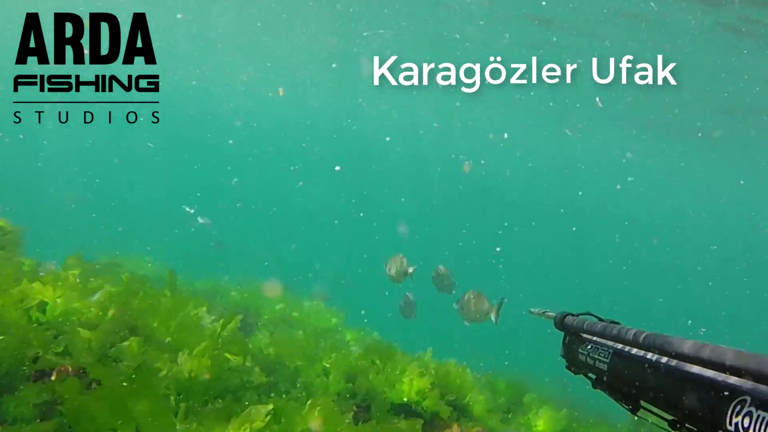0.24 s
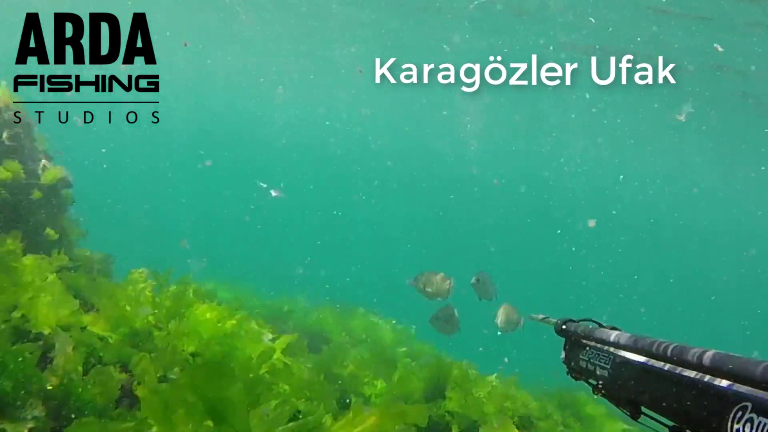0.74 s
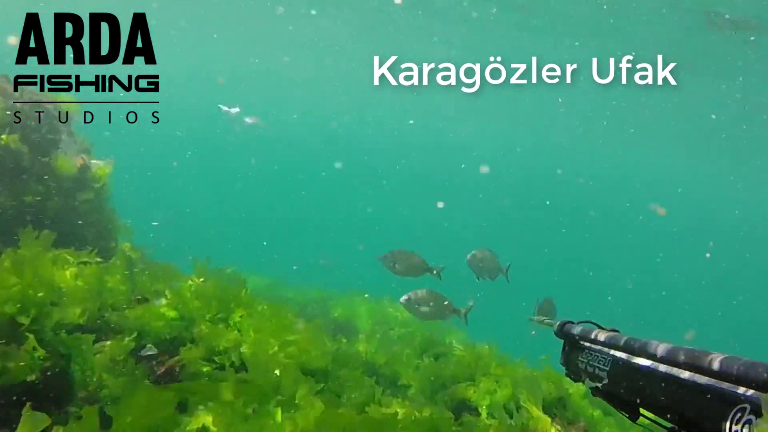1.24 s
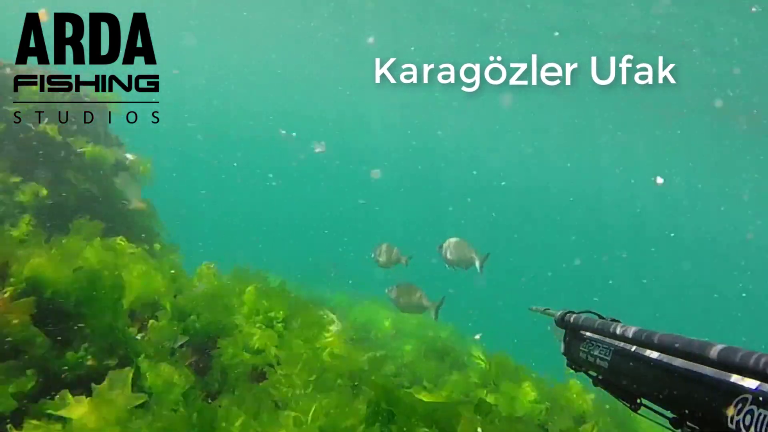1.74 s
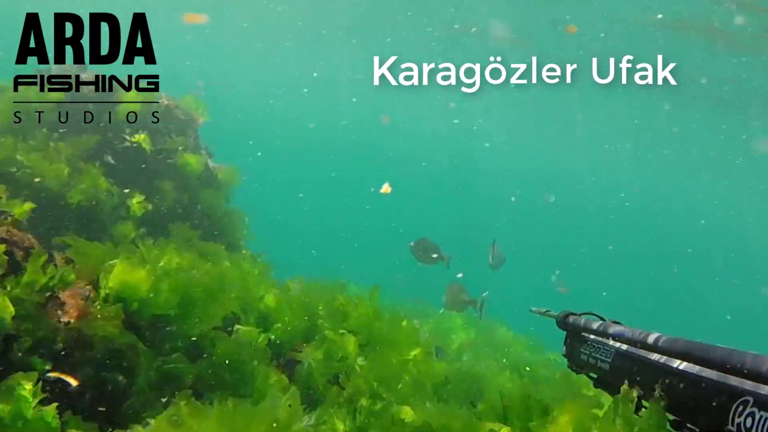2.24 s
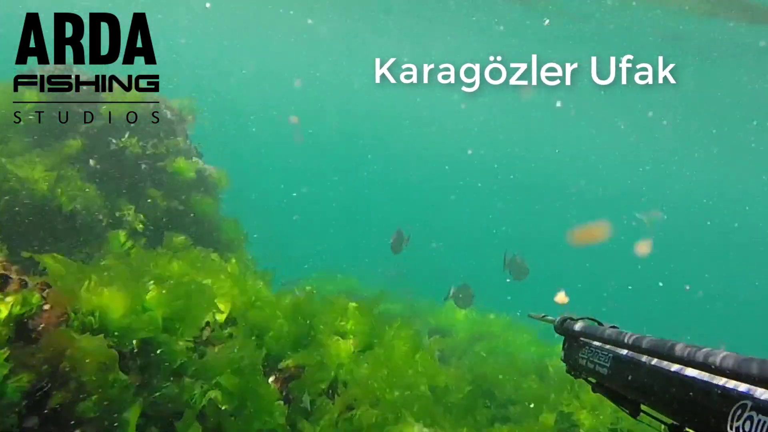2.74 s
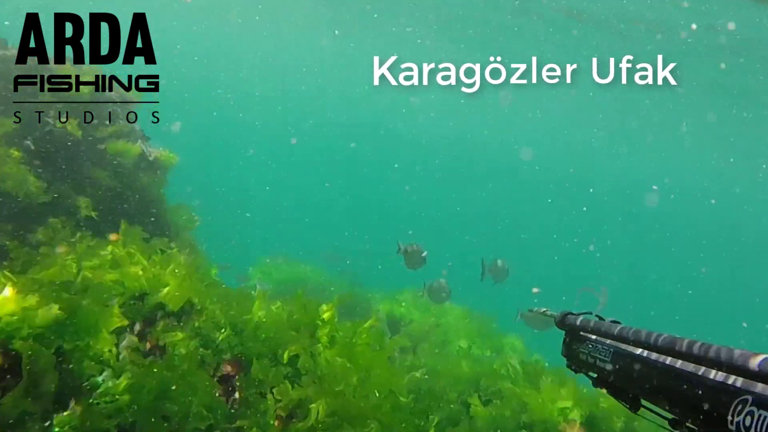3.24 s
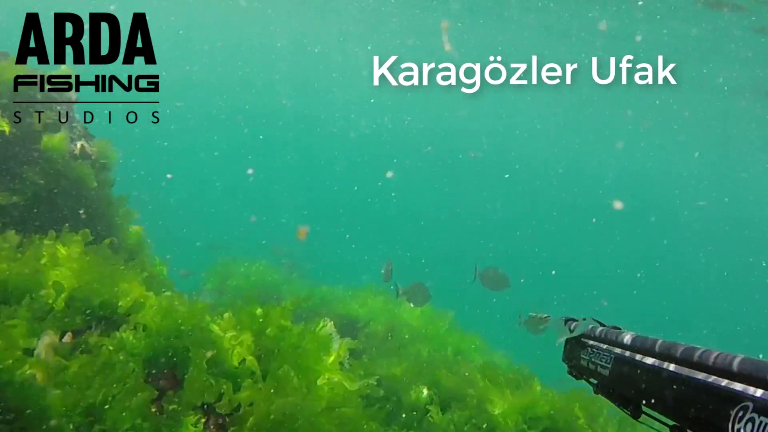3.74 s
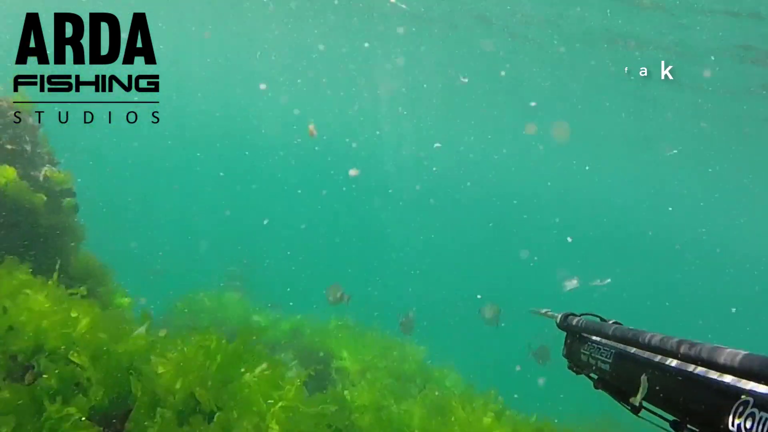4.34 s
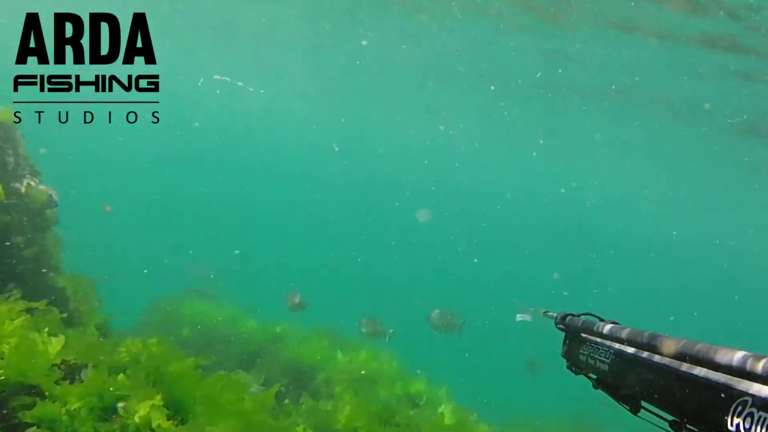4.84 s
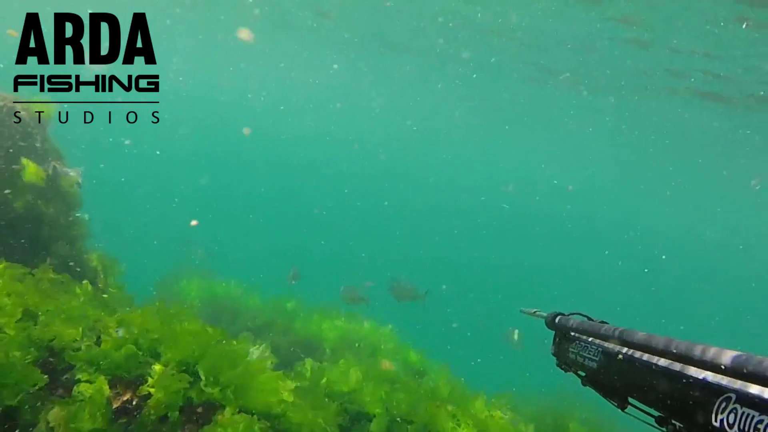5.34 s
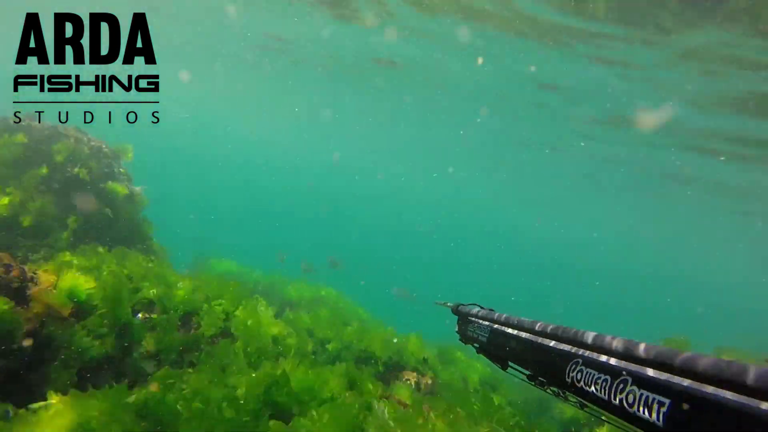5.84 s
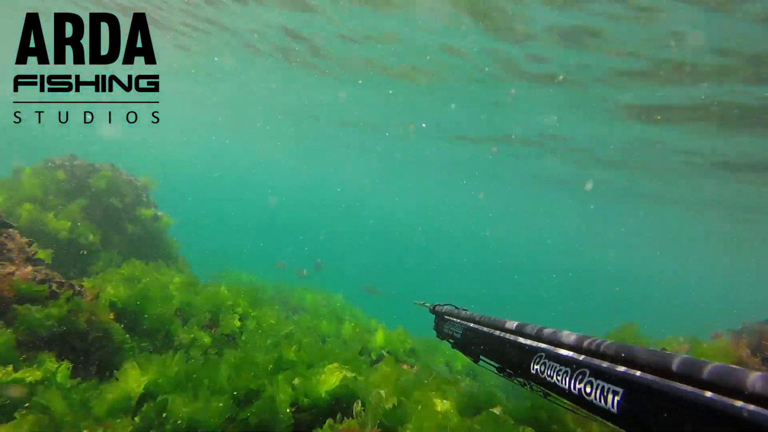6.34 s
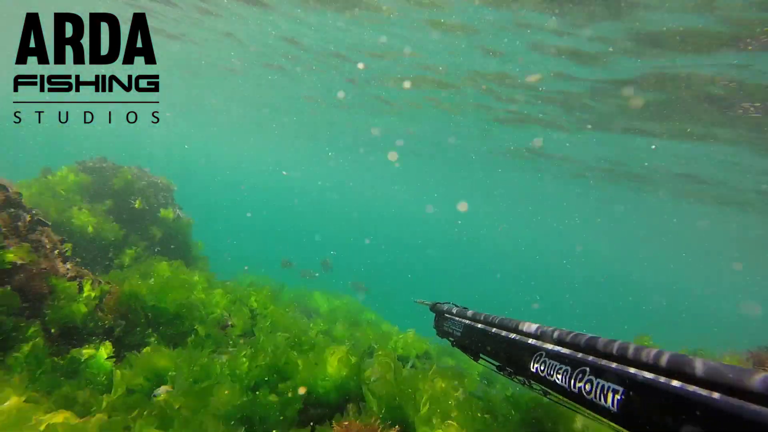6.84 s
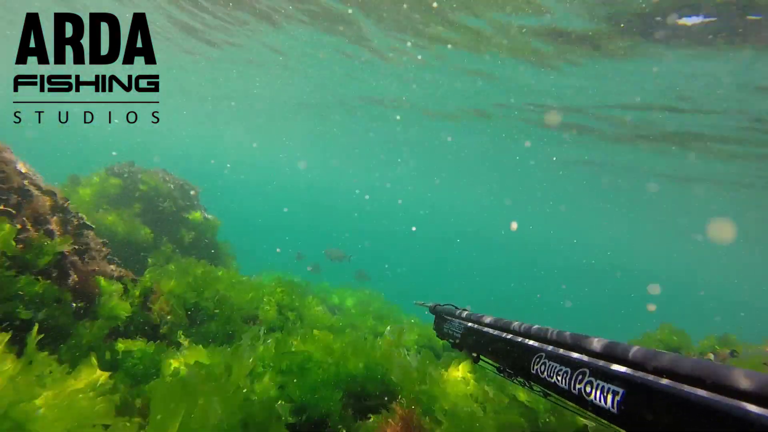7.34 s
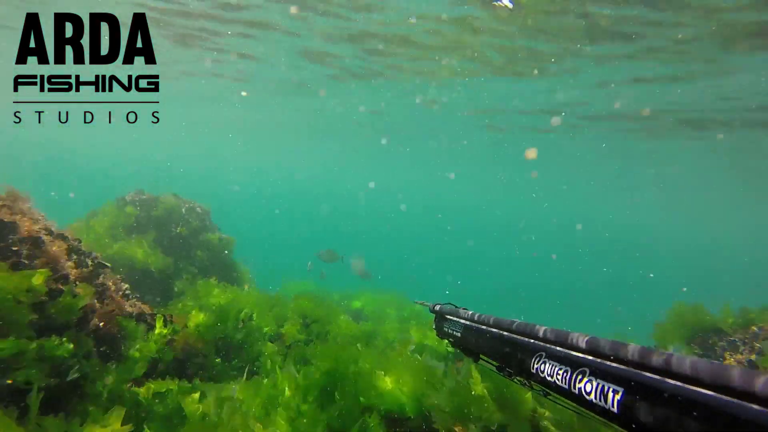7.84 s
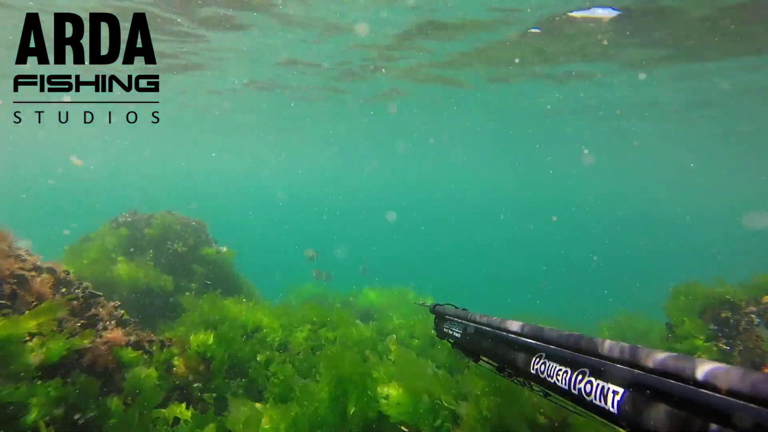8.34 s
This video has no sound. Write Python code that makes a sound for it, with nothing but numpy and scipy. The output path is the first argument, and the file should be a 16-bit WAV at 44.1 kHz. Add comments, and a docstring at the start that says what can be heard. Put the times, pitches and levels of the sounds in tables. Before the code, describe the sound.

Dry, dense crackling of a shallow reef heard inside a sealed case, with early gear thumps, loose knocking in quick bouts and faint swishes.

```python
"""A shallow, weedy reef, heard by a camera in a waterproof housing. Snapping shrimp crackle near and far: noisy spikes
that ring the housing's resonances. Gear bumps and a loose part knocking in bouts are shaped noise driving body modes.
Dull pops ring a damped cavity; two bubbles and two metal taps are decaying tones; water rumbles, washes and swishes
as filtered noise. Peaks over the ceiling make the gain control duck and slowly recover."""
import sys
import numpy as np
from scipy import signal
from scipy.fft import rfft, irfft, next_fast_len
from scipy.io import wavfile
from scipy.ndimage import uniform_filter1d, minimum_filter1d, map_coordinates

SR = 44100
rng = np.random.default_rng(int(sys.argv[2]) if len(sys.argv) > 2 else 0)


def transcribe(signal):
    """Save signal, clipped to [-1, 1], as a 16-bit WAV file at the path in sys.argv[1]."""
    frames = np.atleast_2d(signal).T
    limited = np.clip(frames, -1, 1)
    pcm = np.round(limited * 32767).astype(np.int16)
    wavfile.write(sys.argv[1], SR, pcm)


N = 377937
TIME = np.arange(N) / SR  # s


def amp(db):
    """Decibels to gain."""
    return 10 ** (np.asarray(db) / 20)


def unit(x):
    """Scale to rms 1."""
    return x / np.sqrt(np.mean(x ** 2) + 1e-20)


def peak(x):
    """Largest absolute value."""
    return np.abs(x).max()


def along(points, hz):
    """Interpolate (Hz, value) points on a log-frequency axis."""
    point_hz, value = np.transpose(points)
    return np.interp(np.log(hz + 1), np.log(point_hz + 1), value)


def curve(rows):
    """Join (s, value) rows by straight lines, one value per sample."""
    return np.interp(TIME, *np.transpose(rows))


def wobble(knots_per_s):
    """Smooth random curve: a spline through normal draws, evaluated every 32 samples."""
    coarse_s = TIME[::32]
    knots = rng.standard_normal(int(N * knots_per_s / SR) + 4)
    return np.interp(TIME, coarse_s, map_coordinates(knots, [coarse_s * knots_per_s]))


def filtered(x, response):
    """Multiply the spectrum of x by a function of frequency."""
    m = next_fast_len(len(x) + 4096)  # padded so that tails do not wrap
    spectrum = rfft(x, m) * response(np.fft.rfftfreq(m, 1 / SR))
    return irfft(spectrum, m)[:len(x)]


def resonances(modes, f):
    """Causal response of a body with (Hz, width Hz, dB) modes of alternating sign."""
    total = 0
    for k, (centre_hz, width_hz, db) in enumerate(modes):
        damping = 1j * f * width_hz
        total = total + (-1) ** k * amp(db) * damping / (centre_hz ** 2 - f * f + damping)
    return total


def lowpass(f, corner_hz):
    """Two-pole low-pass response."""
    return 1 / (1 + np.sqrt(2) * 1j * f / corner_hz - (f / corner_hz) ** 2)


def highpass(f, corner_hz):
    """Two-pole high-pass response."""
    return -(f / corner_hz) ** 2 * lowpass(f, corner_hz)


def add(track, s, db, sound, measure=peak):
    """Mix in a sound at s seconds, its measure scaled to db."""
    part = track[max(round(s * SR), 0):][:len(sound)]
    part += (amp(db) * sound / measure(sound))[:len(part)]


def near_shrimp(scatter=0.17, scatter_t60_s=0.017, seabed_db=-50, seabed_t60_s=0.058, ripple_depth_db=4.0):
    """Each collapsing cavity sends one spike, then scatter from the rocks and the surface."""
    # The nearest snaps. Each row: start in seconds, level over 10 ms in dB, then extra body, treble and air in dB.
    nearest = [(0.049, -35, 1, 21, -15), (0.1528, -30, -1, 6, -9), (0.1825, -23.5, 1, 5.5, 3),
               (0.298, -38.5, -15, 17, -5), (0.3428, -13, -5, -16, -11), (0.3875, -34, -4.5, -17, -6),
               (0.499, -37, 1, 10, 17), (0.6991, -19.5, 6, -3, 4), (0.7126, -26.5, 7, -22, -2),
               (0.728, -35, -3, -4, 6), (0.751, -30.5, 2, -12, 5), (0.8183, -31.5, -11, 4, -10),
               (1.0013, -35.5, -20, 13, 5), (1.103, -17.5, -5, -1.5, 2.5), (1.346, -40, -9, 21, 20),
               (1.4049, -37.5, 10, 2, 20), (1.4235, -34.5, -3, 5, -13), (1.4999, -29.5, 0, -6, -18),
               (1.658, -26, -14, -22, -5), (1.7032, -28.5, -3, 6, -13), (1.7158, -24, -4.5, -11, 5),
               (1.7821, -34.0, -6, -2, -18), (1.9102, -28.5, 14.5, 16.5, 13), (2.0312, -36.0, -10, 0, 7),
               (2.0566, -38, -16, -34, -11), (2.168, -15.5, 10.5, -11, -10), (2.3443, -24.5, -6.5, -3, -12),
               (2.4473, -25, -10, -10, 1), (2.6225, -29.5, 0, 3, -5), (2.6808, -27.5, -9, 2, -11),
               (2.7515, -25.5, -12, -7, 5.5), (2.7962, -16, -13, 4, -3), (2.843, -32, -11, -4, 4),
               (2.927, -43, 6, 13, 26), (3.0342, -0.5, 0.5, -15, 0), (3.108, -29, 1, 6, 3),
               (3.1189, -29, -23, 0, 7), (3.2482, -29.5, -34, 12, -9), (3.271, -24.5, -5, -8, 6),
               (3.4378, -33, 0, 9, -4), (3.4501, -26.5, 1.5, -9, -17), (3.561, -30.5, 6.5, 11.5, -3),
               (3.6004, -35.5, -15, 6, 8), (3.714, -34.5, -6.5, 6, 10), (3.7944, -35.5, -6, 6, 9),
               (3.9692, -18.0, -2.5, -11, -12), (4.1451, -34, 6, 8, 5), (4.2086, -18.5, -15, -2.5, -0.5),
               (4.328, -34.5, -3, -2, 6), (4.3418, -28.5, -4, -1, 9), (4.411, -34, -9, 5, 5),
               (4.428, -40, -4, -6, 8), (4.4382, -19, -5, -2, 4), (4.4545, -30, -6, 0, 7),
               (4.48, -22.5, 7, -6, -2), (4.893, -34.0, -25, 17, -12), (5.119, -21.0, -7, -1.5, 1),
               (5.193, -25, -2.5, -4, 6), (5.2127, -25.5, -9, -10, 8), (5.2769, -28, -11, -18, 10.5),
               (5.3611, -26.5, 2, -8, -19), (5.3884, -35.0, -7, -1, 6), (5.6539, -22.0, 2.5, 0.5, 1),
               (5.6734, -28.5, -4, -18, 1), (5.7443, -17, -5, -20, -7), (5.7931, -22, -9, -5, 0),
               (5.8769, -33, -2, -20, -7), (5.9028, -29.5, -10, -2, -16), (6.1601, -38.5, 17, 0, 26),
               (6.3565, -23.5, -5.5, 3, -7), (6.4638, -7.5, -4, -15, -0.5), (6.5128, -29, -12, -5, 3),
               (6.545, -31.5, -6, 1, -17), (6.6326, -38.5, -16, 3, -5), (6.6482, -37.5, -9, 8, 5),
               (6.7252, -33.5, -11.5, 2, 4), (6.8304, -26.5, -12, 0, -15), (6.9264, -27.0, -5.5, -9, 3),
               (7.0294, -29.5, -7, -9, -14), (7.0566, -21.5, -9, -12, 3.5), (7.1308, -24.5, -5, 3, 18),
               (7.141, -28.5, -20, -17, -9), (7.2849, -38, -11, 17, 11), (7.3416, -4, -4.5, -8.5, -11),
               (7.5837, -36.5, -11.5, 8, 7), (7.7234, -38.5, -7, -3, -13), (7.8465, -41, -7.5, 7, 10),
               (7.9531, -34.5, 1, 7, 4), (8.1112, -32.5, 4, 3, 7), (8.1328, -29.5, -6, 1, -15),
               (8.144, -35, 4, -16, -12), (8.1678, -22.0, 12.5, 1, -15), (8.2817, -35.5, -5, 3, 12),
               (8.3653, -36, -7, -3, -5), (8.4362, -38.0, 0, 12, 1), (8.459, -37.5, 18, 16, 24)]
    out, t = np.zeros(N), np.arange(2048) / SR
    bands_hz = np.geomspace(2000, 15000, num=14)

    def over_10_ms(x):
        """Rms as if all the energy fell within 10 ms."""
        return np.sqrt(np.sum(x ** 2) / (.01 * SR))

    for s, db, body_db, treble_db, air_db in [*nearest, *neighbours()]:
        tail = scatter * amp(-60 * t / scatter_t60_s) + amp(seabed_db - 60 * t / seabed_t60_s)
        spike = rng.standard_normal(len(t)) * tail
        spike[8] += 1
        colour = [(1100, body_db), (1800, 0), (2700, 0), (5000, treble_db), (10000, air_db)]  # (Hz, dB)
        # short waves enter the case differently from every direction
        ripple_db = ripple_depth_db * rng.standard_normal(len(bands_hz)) * np.linspace(.5, 1, num=len(bands_hz))

        def path(f):
            """Housing, colour and ripple together."""
            return housing(f) * amp(along(colour, f) + np.interp(f, bands_hz, ripple_db))

        add(out, s, db, filtered(spike, path), over_10_ms)
    return out


def neighbours(snaps_per_s=12):
    """Random snaps from a little farther off, as rows like those of the nearest shrimp."""
    count = round(snaps_per_s * N / SR)
    times_s = rng.random(count) * N / SR
    # level, body, treble and air
    typical_db, spread_db = np.array([-42, 1, 8.5, 3.5]), np.array([0, 11, 4.5, 3.5])
    chance = np.clip(rng.standard_normal((count, 4)), -1.5, 1.5)
    return np.column_stack([times_s, typical_db + spread_db * chance])


def housing(f):
    """The stiff case passes little bass and rings for a few milliseconds."""
    # Modes heard through the water. Each row: centre in Hz, width in Hz, level in dB.
    case_modes = [(727, 90.4, 1), (1093, 107, -1.5), (1350, 160, -13.5), (1790, 105, 4.5), (2118, 108, 5.5),
                  (2598, 202.5, 2.5), (3490, 376, -6), (4114, 390, -6.5), (5854, 1203, -13.5),
                  (8850, 1570, -26.5), (13000, 450, -40)]
    return resonances(case_modes, f) * highpass(f, 488) ** 2


def bumps(after_db=-25, after_t60_s=0.26, bass_share=0.13):
    """Rough contacts shake the gear; soft ones reach only its low modes, hard scrapes mainly its high ones."""
    # Bumps and scuffs. Each row: start in seconds, peak in dB, contact length in seconds,
    # softness corner in Hz, grit in dB.
    contacts = [(0.439, -17.5, 0.032, 1300, -34), (0.51, -21, 0.0033, 690, -35),
                (0.544, -10.5, .034, 890, -5), (0.564, -9, 0.0044, 1300, -29),
                (.575, -25.5, 0.023, 342, -14), (0.602, -14, 0.0041, 180, -46),
                (1.816, -23.5, 0.0032, 700, -34), (1.861, -9, 0.018, 308, -34.5),
                (1.992, -31.5, .05, 600, -21), (2.074, -4.5, 0.013, 580, -20),
                (2.106, -27, 0.017, 300, -13.5), (2.172, -6.5, 0.02, 630, -34), (2.191, -23, 0.02, 550, -4),
                (2.247, -27.5, 0.0054, 600, -30), (2.309, -32, 0.0093, 600, -30.5),
                (2.345, -5.5, 0.0081, 560, -32.5)]
    # Modes of the bumped gear. Each row: centre in Hz, width in Hz, level in dB.
    gear_modes = [(75, 19, -9.5), (123, 29, -11), (219.6, 18, -1.5), (301, 18, 0.5), (365, 43, 1.5),
                  (456, 33, 2), (539, 44, -1.5), (799, 40, -5), (1153, 91, -1), (1380, 800, -6),
                  (2700, 2500, -9)]
    out, t = np.zeros(N), np.arange(SR // 4) / SR
    for s, db, length_s, corner_hz, grit_db in contacts:
        pressing = np.exp(-(t / length_s) ** 4) + amp(after_db - 60 * t / after_t60_s)
        force = pressing * rng.standard_normal(len(t))

        def struck_gear(f):
            """Gear modes driven through the contact."""
            contact = lowpass(f, corner_hz) + amp(grit_db) * lowpass(f, 3300)
            return resonances(gear_modes, f) * contact * highpass(f, bass_share * corner_hz)

        add(out, s, db, filtered(force, struck_gear))
    return out


def knocks(rattle=0.067, rattle_t60_s=0.049):
    """A loose part taps the mount, about twelve times a second in each bout, with a tiny rattle."""
    # Modes of mount and housing struck directly. Each row: centre in Hz, width in Hz, level in dB.
    mount_modes = [(68, 18, -2.5), (214.2, 10.9, 3), (318, 28.8, 6.5), (352, 64, -20.5), (670, 43, -13),
                   (1080, 400, -17.5), (1167, 340, -12), (2480, 1170, -36.5), (3970, 410, -40)]
    out, t = np.zeros(N), np.arange(SR // 10) / SR
    for s, db in knock_train():
        tap = rattle * rng.standard_normal(len(t)) * amp(-60 * t / rattle_t60_s)
        tap[0] = 1
        add(out, s, db, filtered(tap, lambda f: resonances(mount_modes, f) * lowpass(f, 2300)))
    return out


def knock_train(gap_s=.085, swing_s=.006, jitter_s=.0015, spread_db=0.7):
    """(s, peak dB) of every knock: to and fro, the return stroke late, the level sloping through each bout."""
    # Each row: first knock in seconds, last knock in seconds, first peak in dB, last peak in dB.
    bouts = [(.07, .29, -32, -43), (.947, 1.148, -40, -35), (1.389, 1.612, -26, -34),
             (1.744, 2.005, -32, -36), (2.67, 2.86, -26, -26), (3.016, 3.183, -22, -35),
             (3.266, 3.431, -26, -19), (3.668, 3.81, -39, -36), (3.97, 4.31, -22, -25),
             (4.405, 4.485, -28, -26), (4.565, 4.812, -30, -25), (4.93, 5.33, -40, -33),
             (5.441, 5.808, -34, -34), (5.997, 5.997, -35, -35), (6.168, 6.518, -34, -36),
             (6.916, 7.244, -35, -37), (7.845, 8.118, -38, -31)]
    for first_s, last_s, first_db, last_db in bouts:
        count = round(abs(last_s - first_s) / gap_s) + 1
        steps = np.linspace((first_s, first_db), (last_s, last_db), count)
        for k, (s, db) in enumerate(steps):
            yield s + swing_s * (k % 2) + jitter_s * rng.normal(), db + spread_db * rng.normal()


def pops(crack=0.9):
    """Small pockets of gas in the weed burst softly and ring for a few cycles."""
    # Each row: start in seconds, peak in dB, pitch in Hz.
    bursts = [(1.322, -17.5, 770), (1.497, -25.5, 880), (1.73, -24.5, 1030), (2.636, -25, 746),
              (2.842, -31, 820), (4.089, -21, 990), (5.327, -26, 790), (5.939, -30.5, 770),
              (7.081, -39, 900)]
    out = np.zeros(N)
    for s, db, pitch_hz in bursts:

        def cavity(f):
            """Cavity ring plus a crack through the housing, dulled."""
            ring = resonances([(pitch_hz, 190, 0)], f) * highpass(f, 490)
            return (ring + crack * housing(f)) * lowpass(f, 890)

        add(out, s, db, filtered(signal.unit_impulse(1024), cavity))
    return out


def bubbles_and_pings():
    """Bubbles swell softly and rise in pitch; lightly tapped metal rings almost at once and holds its pitch."""
    # Air bubbles. Each row: start in seconds, peak in dB, starting pitch in Hz, T60 in seconds.
    bubbles = [(1.303, -24.5, 130, 0.05), (4.617, -17.5, 164, 0.062)]
    # Taps on metal. Each row: start in seconds, peak in dB, pitch in Hz, T60 in seconds.
    pings = [(1.91, -15.5, 2045, 0.051), (6.164, -21, 1830, 0.015)]
    out = np.zeros(N)
    for s, db, pitch_hz, t60_s in bubbles:
        add(out, s, db, ringing(pitch_hz, t60_s, attack_s=0.0036, glide=0.68))
    for s, db, pitch_hz, t60_s in pings:
        add(out, s, db, ringing(pitch_hz, t60_s, attack_s=0.00099, glide=0))
    return out


def ringing(pitch_hz, t60_s, attack_s, glide):
    """A dying tone whose pitch rises by the fraction glide per T60."""
    t = np.arange(SR // 4) / SR
    tone = np.sin(2 * np.pi * pitch_hz * t * (1 + glide * t / t60_s / 2))
    return tone * amp(-60 * t / t60_s) * (1 - np.exp(-(t / attack_s) ** 2))


def water(wash_db=-26, swish_edge_s=0.0038):
    """A stronger push gives more rumble and a faint wash; quick eddies swish in a narrow band."""
    # Push on the camera. Each row: time in seconds, rumble level in dB.
    push_levels = [(0, -45), (.4, -44.5), (.6, -32), (.8, -48.5), (1.4, -41), (2.35, -31.5), (2.6, -40),
                   (3.4, -42), (3.65, -49), (4, -39.5), (4.8, -37), (4.98, -47), (6.4, -44), (6.65, -54),
                   (7, -45), (7.8, -47), (8, -44), (8.57, -47)]
    # Swishes past the case. Each row: start in seconds, length in seconds, level in dB.
    swishes = [(4.596, 0.076, -40.5), (4.663, 0.32, -55), (5.627, 0.092, -49), (6.055, 0.027, -52),
               (6.775, 0.5, -52)]
    # Spectra of the three noises. Each row: frequency in Hz, relative level in dB.
    rumble_spectrum = [(10, -19.5), (26, 2.5), (40, 0), (51, -13.5), (66, 1), (88, -20.5), (115, -17.5),
                       (150, -21), (215, -13.5), (270, -19.5), (450, -25.5), (1200, -43.5), (3000, -100)]
    wash_spectrum = [(100, -20), (300, -4), (480, -20.5), (720, 6), (900, -9.5), (1080, -7.5), (1350, -5),
                     (2500, -39), (6000, -31)]
    swish_spectrum = [(150, -49), (450, -12.5), (560, -6.5), (620, 1.5), (740, -1), (830, -13),
                      (1080, -10.5), (1300, -24), (1900, -15), (2700, -16.5), (6000, -47)]
    rumble = flow(rumble_spectrum, surge_db=3.36, surges_per_s=16)
    wash = flow(wash_spectrum, surge_db=6.5, surges_per_s=78)
    push = amp(curve(push_levels)) * (rumble + amp(wash_db) * wash)
    eddies = np.zeros(N)
    for s, length_s, db in swishes:
        to_edge_s = np.minimum(TIME - s, s + length_s - TIME)
        eddies += amp(db) * np.clip(to_edge_s / swish_edge_s, 0, 1)
    return push + eddies * flow(swish_spectrum, surge_db=1.5, surges_per_s=41)


def flow(spectrum, surge_db, surges_per_s):
    """Turbulent water noise that comes in small surges, at rms 1."""
    noise = filtered(rng.standard_normal(N), lambda f: amp(along(spectrum, f)))
    return unit(noise * amp(surge_db * wobble(surges_per_s)))


def reef(level_db, treble_db=7, ticks_db=4, fizz_db=-4.5):
    """Far ticks, higher in pitch the smaller the claw, over the fizz of many more snaps."""
    tilt = [(2000, 0.012), (6000, treble_db), (12000, treble_db + 13.0)]  # (Hz, dB)

    def through_case(x):
        """Housing and treble tilt, at rms 1."""
        return unit(filtered(x, lambda f: housing(f) * amp(along(tilt, f))))

    ticks = 0
    for pitch_hz in np.geomspace(1100, 12000, num=8):
        # a bell half an octave wide to either side
        claw = lambda f: np.exp(-(np.log2((f + 1) / pitch_hz) / .5) ** 2)
        ticks = ticks + filtered(colony(snaps_per_s=50, spread_db=7), claw)
    fizz = colony(snaps_per_s=600, spread_db=8)
    swell = amp(1.4 * wobble(knots_per_s=13))
    return swell * (amp(level_db + ticks_db) * through_case(ticks) + amp(level_db + fizz_db) * through_case(fizz))


def colony(snaps_per_s, spread_db, scatter=0.22, scatter_t60_s=0.021):
    """Random far snaps of unequal size, each trailed by its own scatter, at rms 1."""
    chance, size = rng.random(N), rng.standard_normal(N)
    sizes = amp(spread_db * np.minimum(size, 1.5))
    spikes = (chance < snaps_per_s / SR) * sizes * rng.choice([-1, 1], N)
    power_decay = amp(-60 / (SR * scatter_t60_s)) ** 2  # per sample
    trails = np.sqrt(signal.lfilter([1], [1, -power_decay], spikes ** 2))
    return unit(spikes + scatter * trails * rng.standard_normal(N))


def scene():
    """Shrimp, gear and water at the one microphone."""
    # Crackle of the far reef. Each row: time in seconds, level in dB.
    distant = [(0, -55), (.6, -58.5), (1.6, -55), (2.4, -59.5), (4, -61), (4.55, -56), (5.6, -58),
               (7.1, -60), (7.6, -59), (8.57, -55.5)]
    shrimp = near_shrimp() + reef(curve(distant))
    gear = knocks() + bumps()
    return (shrimp + pops() + gear + bubbles_and_pings() + water())[None]


def record(dry, ceiling_db=-2.8, recovery_db_per_s=21, top_hz=15600):
    """Gain control drops quickly on an overload and creeps back; then the band limit."""
    x = dry[0]
    over_db = np.maximum(20 * np.log10(np.abs(x) + 1e-9) - ceiling_db, 0)
    # running maximum, so that the gain falls just ahead of a peak
    ahead_db = -minimum_filter1d(-over_db, size=65)
    recovered_db = recovery_db_per_s * TIME
    cut_db = np.maximum.accumulate(ahead_db + recovered_db) - recovered_db
    levelled = x * amp(-uniform_filter1d(cut_db, size=33))
    return filtered(levelled, lambda f: 1 / (1 + (f / top_hz) ** 60))[None]


dry = scene()
out = record(dry)
transcribe(out)
```